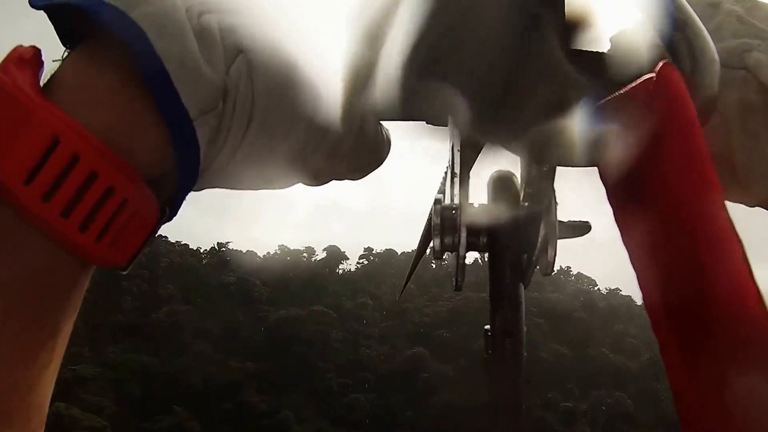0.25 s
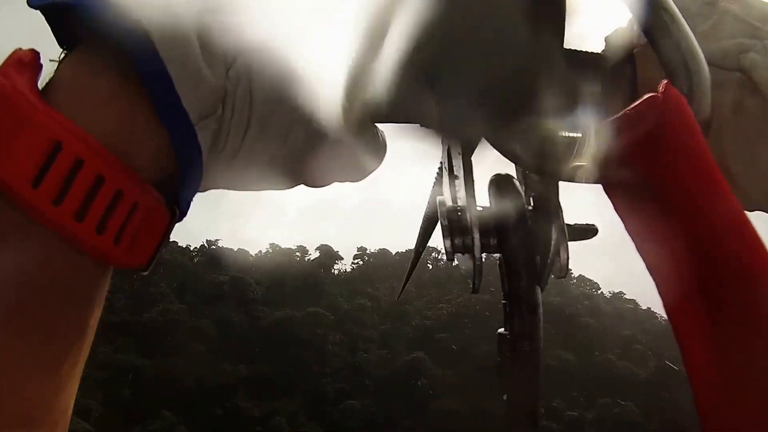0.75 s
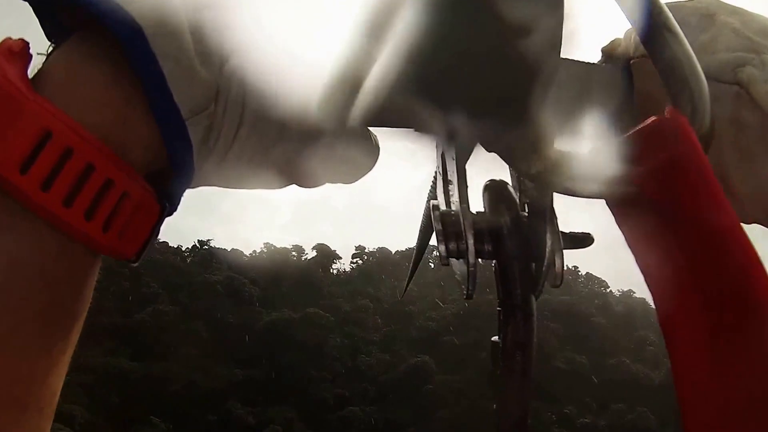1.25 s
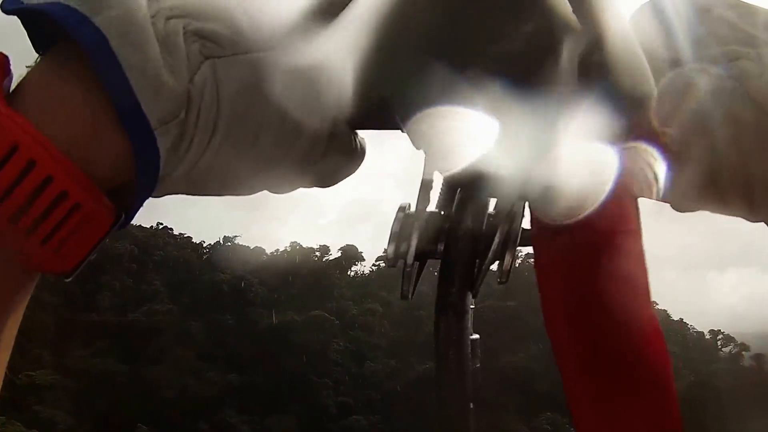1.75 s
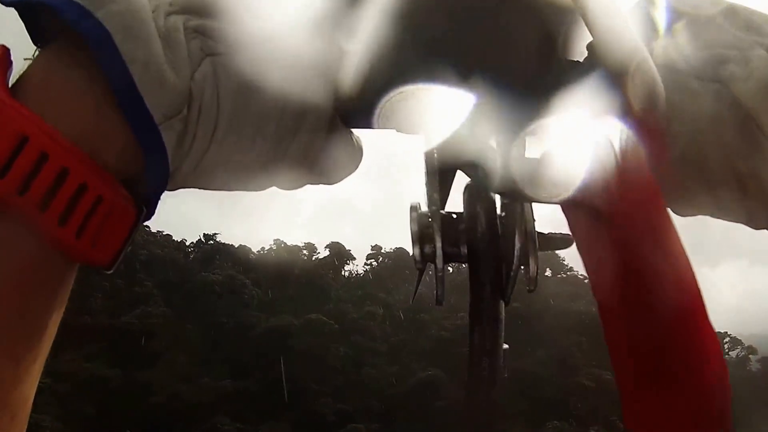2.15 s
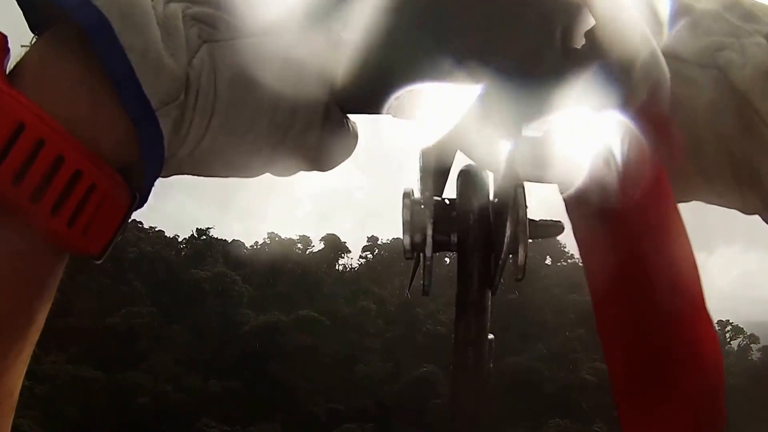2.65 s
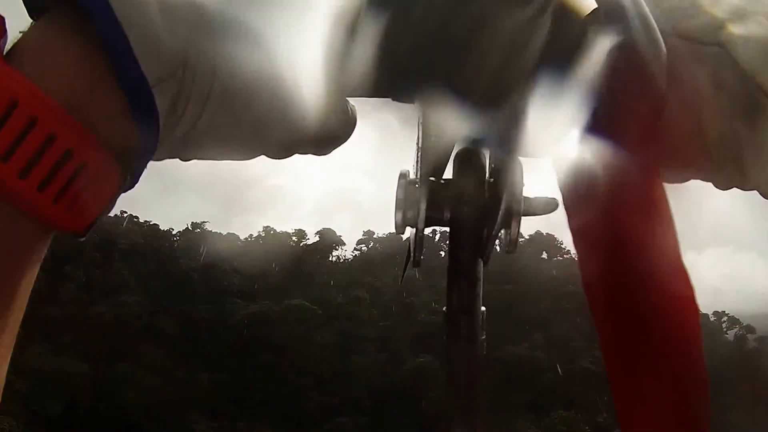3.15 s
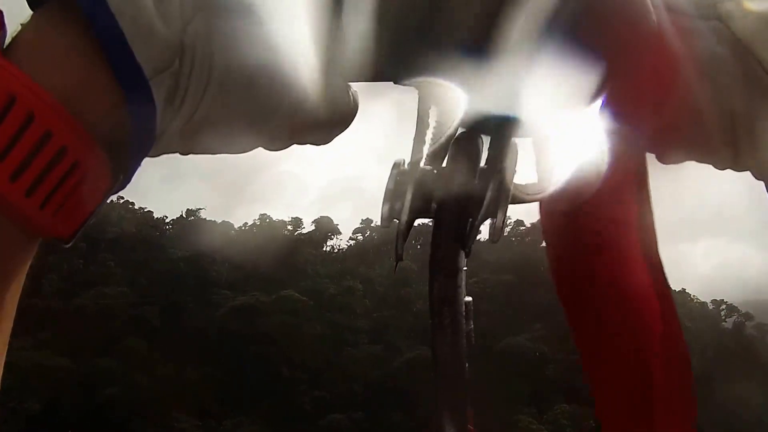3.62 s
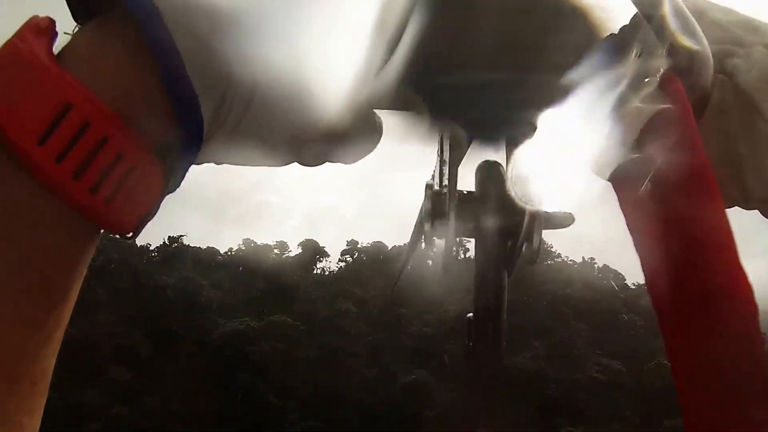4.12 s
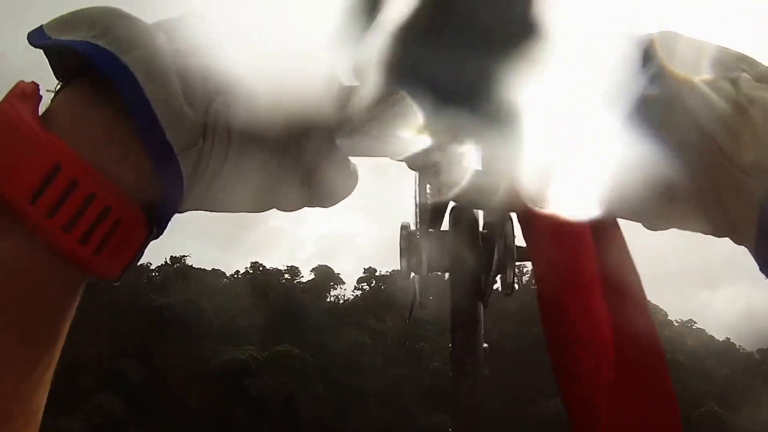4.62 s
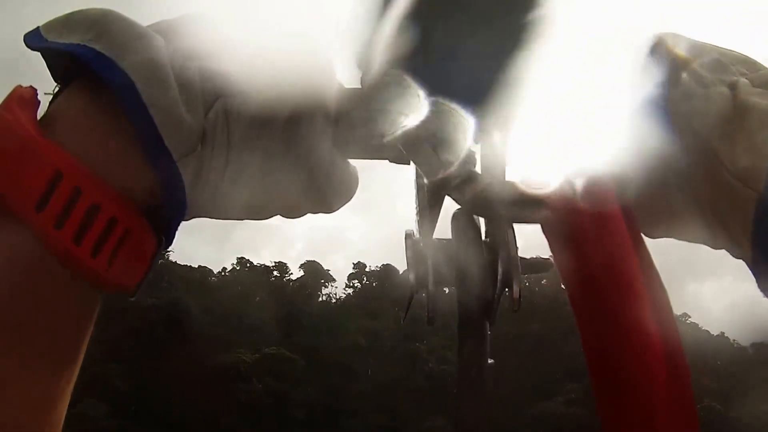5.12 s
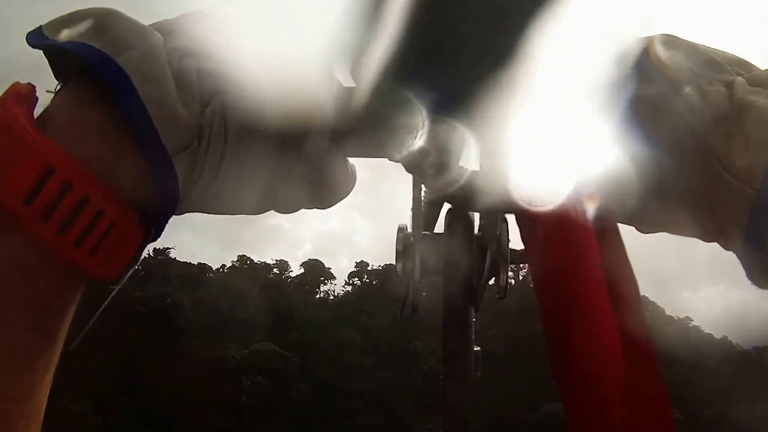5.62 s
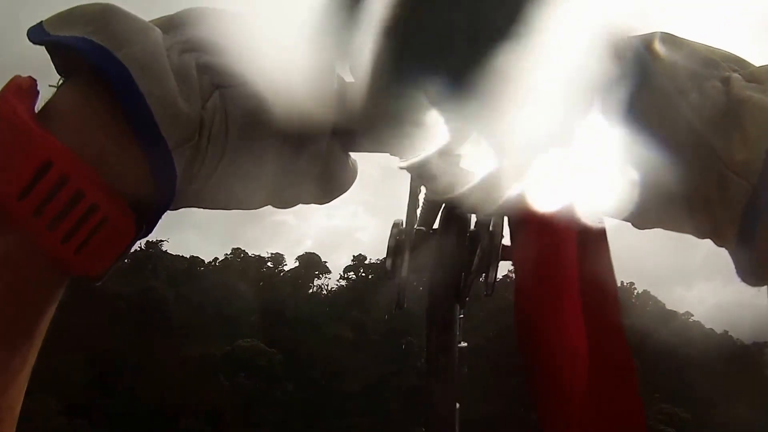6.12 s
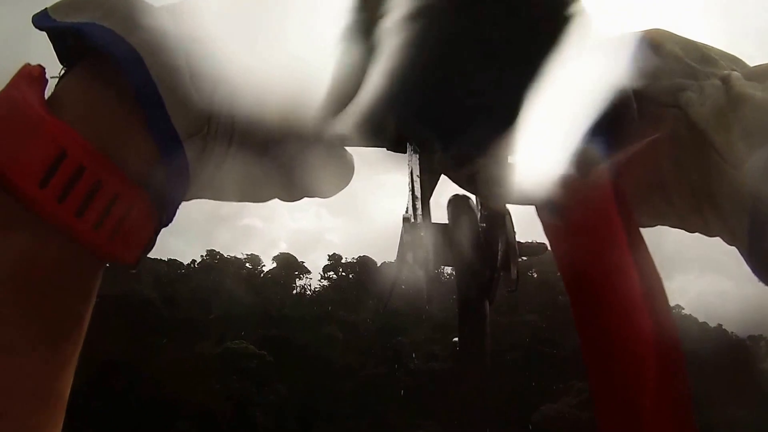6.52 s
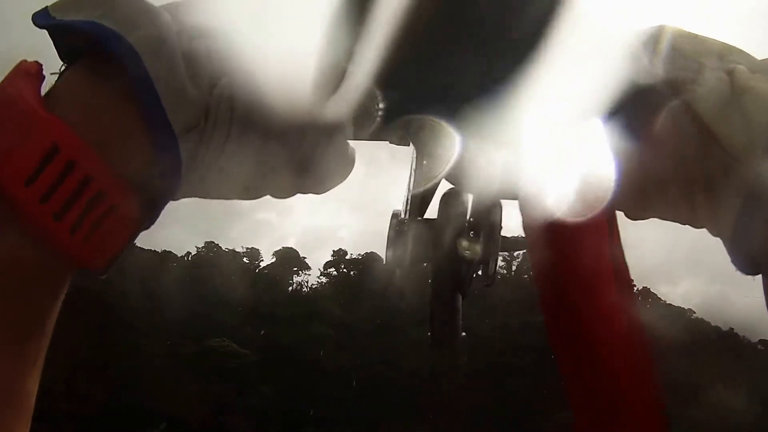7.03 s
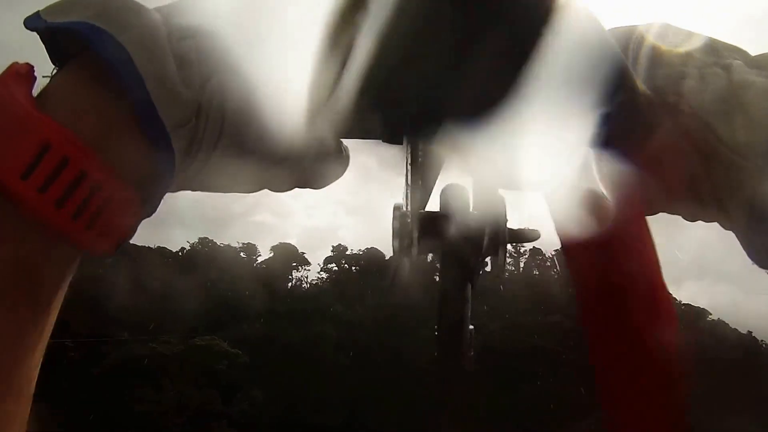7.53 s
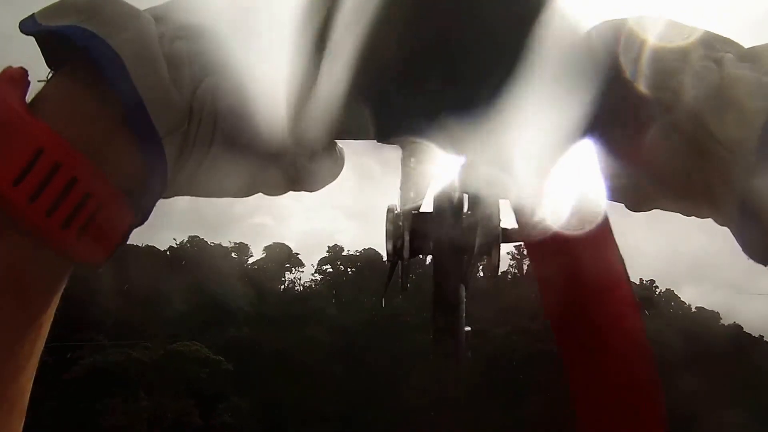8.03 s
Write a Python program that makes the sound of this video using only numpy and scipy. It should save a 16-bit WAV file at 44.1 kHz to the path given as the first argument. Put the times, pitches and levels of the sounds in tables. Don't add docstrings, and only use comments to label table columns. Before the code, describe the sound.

From 0 s a steel trolley is already racing down a stranded cable: a dense, fuzzy metallic whirr with rolling hiss, strongest around 2 to 5 kHz and edged with higher bearing chatter. Its pitch rises gently until about 4 s, then almost levels. The singing rim swells and fades as weight swings, notably around 1.5, 3, 6.3 and 7.7 s. Beneath, wind makes a low thrum and dull roar, fuller at 0.5 s and 4.5 s, weakest near 7.5 s. Raindrops tap the housing: soft knocks at 0.25 and 1.3, bright tick at 2.05, small ones near 2.4 and 2.5, a hard sharp hit at 3.0 that ducks everything before it creeps back, faint taps at 3.3 and 4.0, a strong dull thud at 5.6. The whirr continues to the end at 8.3 s. Close sealed microphone, nearly mono, dry outdoors.

```python
import sys
import numpy as np
from scipy import signal
from scipy.io import wavfile
from scipy.ndimage import uniform_filter1d

SR = 44100
rng = np.random.default_rng(int(sys.argv[2]) if len(sys.argv) > 2 else 0)


def voltage_ratio(decibels):
    exponent = np.asarray(decibels, float) / 20
    return 10 ** exponent


def output_pcm(signal):
    pcm = np.clip(np.atleast_2d(signal).T, -1, 1) * 32767
    wavfile.write(sys.argv[1], SR, np.round(pcm).astype(np.int16))


N = 364707


def evened(x):
    return x / np.sqrt(np.mean(abs(x) ** 2) + 1e-20)


def curve(rows, column, t):
    rows = np.asarray(rows)
    return np.interp(t, rows[:, 0], rows[:, column])


def drift(hz, count=1):
    step = 32
    chance = rng.standard_normal((count, N // step + 2, 2)) @ [1, 1j]
    memory = np.exp(-2 * np.pi * step * np.broadcast_to(hz, count) / SR)
    slow = [evened(signal.lfilter([1], [1, -m], row)) for m, row in zip(memory, chance)]
    return np.array([np.interp(np.arange(N) / step, np.arange(len(row)), row) for row in slow])


def ring(drive, parts, patchy_db, notches=(), hollow=None, size=2048):
    hz, t, z = signal.stft(drive, SR, nperseg=size, noverlap=size * 3 // 4)
    power = np.zeros(z.shape)
    for modes, level_db in parts:
        shape = sum(voltage_ratio(db) ** 2 / (1 + (1.545 * (hz - f) / width) ** 2) ** 2 for f, width, db in modes)
        power += np.outer(shape / shape.mean(), voltage_ratio(level_db(t)) ** 2)
    for f, width, depth in notches:
        power *= (1 - np.clip(depth, 0, 1) / (1 + ((hz - f) / width) ** 2))[:, None]
    if hollow is not None:
        pitch_hz, lift_db = curve(hollow, 1, t), curve(hollow, 2, t)
        for octave, share, width in ((1, 1, 250), (2, 0.56, 250)):
            distance = (hz[:, None] - octave * pitch_hz) / width
            power *= voltage_ratio(2 * share * lift_db / (1 + distance ** 2))
    patches = rng.standard_normal(z.shape[::-1])
    patches = uniform_filter1d(uniform_filter1d(patches, 18, 0), 12, 1).T
    z *= np.sqrt(power) * voltage_ratio(patchy_db * evened(patches))
    return signal.istft(z, SR, nperseg=size, noverlap=size * 3 // 4)[1][:N]


# (time_s, twists_hz [per second])
TWIST_RATE = [(0.0, 124.4), (1.65, 128.75), (3.3, 132.85), (4.0, 134.0), (5.0, 135.1), (6.3, 135.55),
              (8.27, 136.05)]
# (time_s, weight_share [0 on axle, 1 on wheels], rim_bite_db, rolling_level_db)
RIDER_SWING = [(0, 0.14, -5, -.5), (.55, 0.3, -4, 1.5), (1.0, 0.15, -0.5, .5), (1.3, .1, 0.5, 0),
               (1.5, 0.56, 4.5, -1), (2.5, 0.55, 0.5, 0), (3.0, 0.63, 4.5, 0), (3.55, 0.99, 3, 0),
               (4.2, 0.27, -4.5, 1), (4.7, 1, -1, -0.5), (5.25, 0.66, -5.5, 1), (5.6, 0.86, -10, 1),
               (6.3, 0.86, 3, -0.5), (6.75, 0.6, -5, 0.5), (7.05, 0.85, 2, 0), (7.4, 0.88, -5.5, 1),
               (7.65, 0.78, 3.5, 0.5), (8.27, 0.7, -5, 0.5)]
# (pitch_hz, level_db)
ORDER_STRENGTH = [(1500, -4.5), (2000, -16.5), (2300, 4.5), (2600, 4), (3000, 3.5), (3500, 2.5),
                  (4200, -6.5), (5000, 0.5), (5800, 4), (6600, -22)]


def rolling(strand_depth=0.2, rattle_db=-0.06):
    t = np.arange(N) / SR
    strands = 6
    twist_hz = curve(TWIST_RATE, 1, t)
    turn = 2 * np.pi * np.cumsum(twist_hz) / SR
    strand_pulse = np.cos(strands * turn + 2.9 * drift(1.5)[0].real)
    sound = rng.standard_normal(N) * (1 + strand_depth * strand_pulse)
    orders = np.arange(11, 50)
    blur = .0028
    fuzz = drift(blur * orders * twist_hz.mean(), count=len(orders))
    order_hz, order_db = np.transpose(ORDER_STRENGTH)
    share = np.sqrt(4 * twist_hz.mean() / SR)
    share = share * voltage_ratio(3.65 * curve(RIDER_SWING, 1, t) - 2.5)
    steady = np.exp(1j * np.angle(drift(7)[0]))
    steady *= evened(voltage_ratio(2.8 * drift(12.)[0].real))
    for k, wobble in zip(orders, fuzz):
        pitch_hz = k * twist_hz
        lock = 1 / (1 + ((pitch_hz - 2970) / 55) ** 2)
        wobble = (1 - .5 * lock) * wobble + 1.2 * lock * steady
        tone = (wobble * np.exp(1j * k * turn)).real
        sound += share * voltage_ratio(np.interp(pitch_hz, order_hz, order_db)) * tone
    return sound * voltage_ratio(rattle_db * drift(60)[0].real + curve(RIDER_SWING, 3, t))


# (pitch_hz, width_hz, level_db)
SIDE_PLATES = [(986, 130, -28.5), (1250, 500, -73.5), (1727, 207, -12), (1930, 149, 2), (2224, 220, -6.5),
               (2512, 106, -11.5)]
WHEEL_MODES = [(2850, 180, -3.5), (2999, 260, 3), (3340, 264, -0.5), (3595, 310, -6.5)]
SINGING_RIM = [(2975, 115, 0)]
LOWER_AXLE = [(4210, 285, -2), (4480, 144, 1.5), (4600, 230, -9.5)]
UPPER_AXLE = [(4833, 470, 0), (5125, 350, -4.5), (5640, 820, -16.5), (6200, 560, -13)]
BRACKET_MODES = [(5646, 350, 3), (5836, 360, 1)]
BEARING_MODES = [(6690, 81, -7), (7080, 270, -2), (7605, 350, -1.5), (8290, 480, -5.5), (8940, 400, -6),
                 (11600, 1250, -14.5), (12600, 500, -14.5), (13100, 800, -17), (14400, 500, -24),
                 (15100, 480, -18)]
BALL_CAGE = [(9560, 210, -0.41), (10130, 710, -0.59)]
# (pitch_hz, width_hz, depth [0-1])
CANCELLED = [(2367, 72, 0.76), (3130, 163, 0.87), (3910, 210, 0.58), (5607, 178, 0.81)]
# (time_s, pitch_hz, lift_db)
GLOVE_HOLLOW = [(0, 4800, 2.5), (.5, 4850, 3), (.7, 4800, 2.5), (.95, 4600, 5), (1.2, 4850, 4),
                (1.45, 5050, 6), (1.62, 5200, 7), (1.8, 5300, 2.5), (2.3, 5150, 1.5), (2.9, 5200, 1.5),
                (3.7, 4900, -0.3), (4.2, 4700, 2), (4.5, 4600, 2), (4.8, 4700, 1), (8.27, 4800, 0.3)]


def trolley():
    at = np.arange(N) / SR
    chatter_db = 1.3 * drift([5, 7], count=2).real
    wander_db = 1.3 * drift(2.1, count=2).real
    sway = drift(1.3, count=5).real
    jolt_db = 1.35 * sway
    lean_db = -1 * sway[4] / 2
    weight = curve(RIDER_SWING, 1, at)
    bite_db = 2.0 * curve(RIDER_SWING, 2, at)
    rows = [  # modes, level with weight on the axle (dB), change as it moves to the wheels (dB), unsteadiness (dB)
        (SIDE_PLATES, -4.5, -.5, jolt_db[0]),
        (WHEEL_MODES, -8.5, 2.5, jolt_db[1]),
        (SINGING_RIM, -16.5, 3, bite_db),
        (LOWER_AXLE, -7, -6, jolt_db[2] - lean_db),
        (UPPER_AXLE, -7, -6, jolt_db[2] + lean_db),
        (BRACKET_MODES, -18, 7.5, jolt_db[3]),
        (BEARING_MODES, -17, 2, chatter_db[0]),
        (BALL_CAGE[:1], -19, -0.5, chatter_db[1] - 4.0 + wander_db[0]),
        (BALL_CAGE[1:], -19, -0.5, chatter_db[1] - 2.5 + wander_db[1])]
    parts = []
    for modes, rest_db, shift_db, extra_db in rows:
        level_db = rest_db + shift_db * weight + extra_db
        parts.append((modes, lambda t, db=level_db: np.interp(t, at, db)))
    return voltage_ratio(-1.0) * ring(rolling(), parts, patchy_db=0.65, notches=CANCELLED, hollow=GLOVE_HOLLOW)


# (time_s, gust_db)
GUSTS = [(0, 3.5), (.5, 6), (.95, 4), (1.3, -0.5), (1.9, -1.5), (2.3, -3), (2.8, -3), (3.3, -2.5),
         (3.8, -0.5), (4.5, 3), (4.9, 0.5), (5.15, 1.5), (5.7, 2.5), (6.1, -1.5), (6.75, 2.5), (7.1, 0.5),
         (7.5, -7), (8.27, -3.5)]
# (pitch_hz, width_hz, level_db)
HOUSING_THRUM = [(51.4, 14, 0)]
WIND_ROAR = [(35, 40, -20), (94, 60, 0), (159, 23.5, 2), (206, 26, -2.5), (246, 21, -1), (313, 94, -5.5),
             (474, 410, -15), (843, 200, -14)]


def wind():
    pressure = rng.standard_normal(N) * voltage_ratio(2.1 * drift(14)[0].real)
    lumps_db = -0.5 * drift(6.8)[0].real
    at = np.arange(N) / SR

    def thrum_db(t):
        return -26 + 0.77 * curve(GUSTS, 1, t) + np.interp(t, at, lumps_db)

    def roar_db(t):
        return -28 + curve(GUSTS, 1, t)

    return ring(pressure, [(HOUSING_THRUM, thrum_db), (WIND_ROAR, roar_db)], patchy_db=1.03, size=8192)


# (start_s, thud_db, thud_hz, tick_db, tick_hz)
RAINDROPS = [
    (.2455, -29, 1050, -24, 5000),
    (1.3405, -31, 1080, -24, 4700),
    (2.0495, -28, 1070, -4, 4400),
    (2.3975, -42, 1300, -10, 4000),
    (2.5265, -29, 870, -22, 5100),
    (3.0018, -23, 1500, -1, 7200),
    (3.2526, -35, 890, -24, 3050),
    (3.281, -35, 1200, -22, 3000),
    (3.98, -36, 1100, -15, 4000),
    (5.589, -17.5, 960, -24, 4600),
]


def drops():
    out, t = np.zeros(N), np.arange(800) / SR
    for start_s, thud_db, thud_hz, tick_db, tick_hz in RAINDROPS:
        thud = voltage_ratio(thud_db + 2.5 - 60 * t / 0.017) * np.sin(2 * np.pi * thud_hz * t)
        thud *= np.minimum(t / 0.00048, 1)
        click = sum(np.sin(2 * np.pi * hz * t) for hz in (tick_hz / 2, 3300, 4600)) / 2
        click += .15 * np.sin(2 * np.pi * 1600 * t)
        click += .4 * np.sin(2 * np.pi * tick_hz * t)
        tick = voltage_ratio(tick_db - .5 - 60 * t / .01) * click * np.minimum(t / .0003, 1)
        slap = np.sin(2 * np.pi * 1500 * t) * np.exp(-t / .0006)
        place = out[round(start_s * SR):][:len(t)]
        place += thud + voltage_ratio(tick_db - 20) * slap + tick
    low_cut = signal.butter(2, 550, "high", fs=SR, output="sos")
    return signal.sosfilt(low_cut, out)


def gain_control():
    level_db, duck_db = -15, -5
    ahead_s, fall_s, hold_s, recover_s = .0045, .001, 0.17, 0.47
    hardest = max(RAINDROPS, key=lambda drop: drop[3])
    since = np.arange(N) / SR - hardest[0]
    fall = np.clip((since + ahead_s) / fall_s, 0, 1)
    recovery = np.exp(-np.maximum(since - hold_s, 0) / recover_s)
    return voltage_ratio(level_db + duck_db * fall * recovery)


def scene():
    mix = gain_control() * (trolley() + wind()) + drops()
    return np.array([mix, mix])


def on_log_axis(points, hz):
    f, value = np.transpose(points)
    return np.interp(np.log(hz + 1), np.log(f + 1), value)


def band_limit(x):
    return signal.sosfilt(signal.butter(12, 15240, fs=SR, output="sos"), x)


# (pitch_hz, threshold_db)
WEAK_BANDS = [(300, -30), (420, -4), (800, -4), (1000, -30), (10500, -30), (11500, -7), (13200, -5),
              (13800, .5), (14600, 4), (15300, 3)]
# (pitch_hz, level_db [per Hz])
SIDE_NOISE = [(24, -35), (40, 6), (627, -4), (980, -12), (1110, -6), (1610, -3), (3830, -7), (5700, 0),
              (6620, -5), (10100, 1), (15000, -8)]


def record(dry):
    hz, t, z = signal.stft(dry[0], SR, nperseg=2048, noverlap=1024)
    band = np.sqrt(uniform_filter1d(abs(z) ** 2, size=5, axis=0) + 1e-20)
    band /= np.sqrt(np.mean(band ** 2, axis=0))
    usual = np.median(band, axis=1, keepdims=True)
    z *= band > usual * voltage_ratio(on_log_axis(WEAK_BANDS, hz))[:, None]
    busy_moments = rng.random(len(t)) < .3
    busy_bands = np.repeat(rng.random((len(t), 65)) < .6, 16, 1).T[:len(hz)]
    noise = (rng.standard_normal((len(t), len(hz), 2)) @ [1, 1j]).T
    noise = noise * (busy_moments * busy_bands) * voltage_ratio(4.9 * rng.standard_normal(len(t)))
    noise = noise * voltage_ratio(on_log_axis(SIDE_NOISE, hz))[:, None]
    mid, side = signal.istft(np.array([z, noise]), SR, nperseg=2048, noverlap=1024)[1][:, :N]
    side = voltage_ratio(-48.5) * evened(side)
    return band_limit(np.array([mid + side, mid - side]))


dry = scene()
out = record(dry)
output_pcm(out)
```